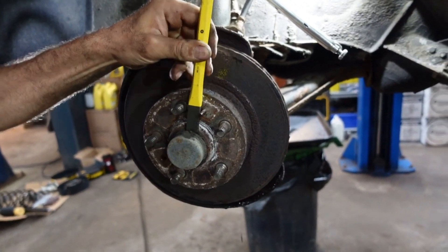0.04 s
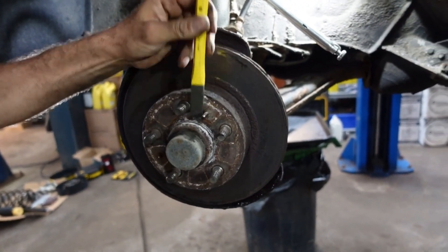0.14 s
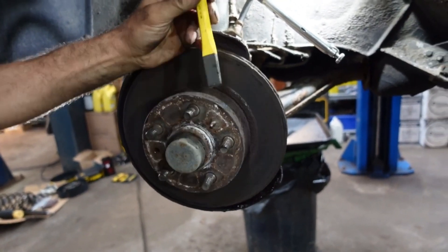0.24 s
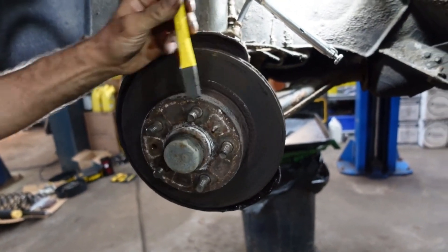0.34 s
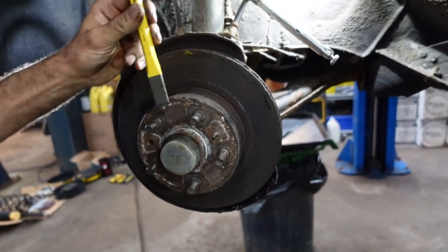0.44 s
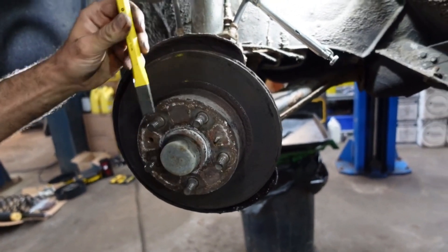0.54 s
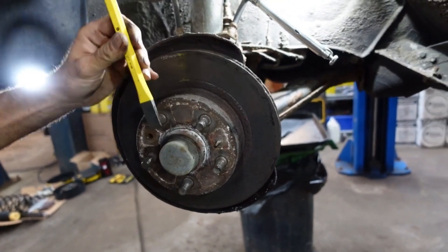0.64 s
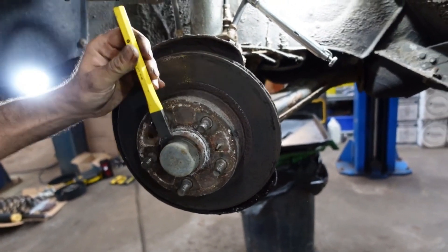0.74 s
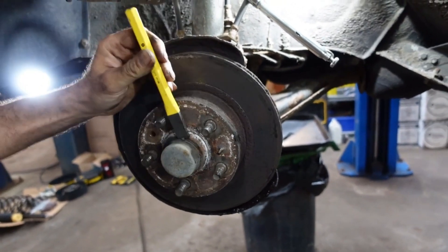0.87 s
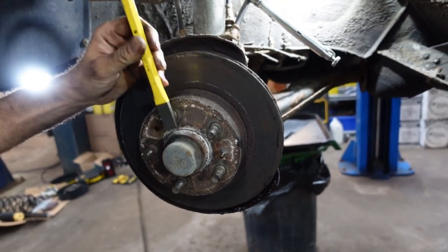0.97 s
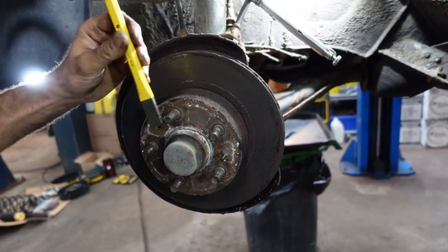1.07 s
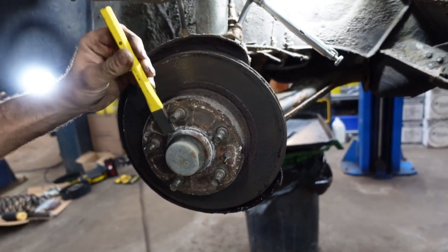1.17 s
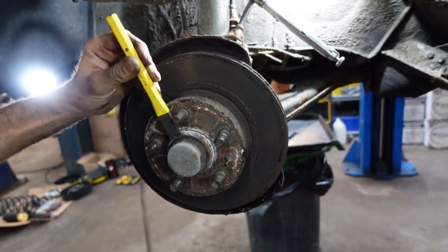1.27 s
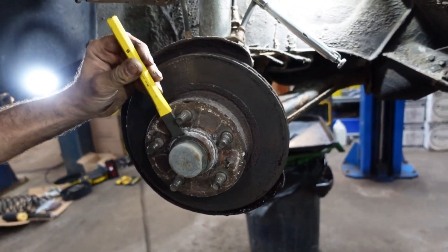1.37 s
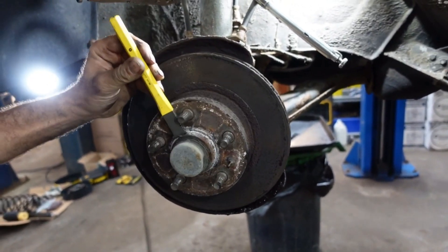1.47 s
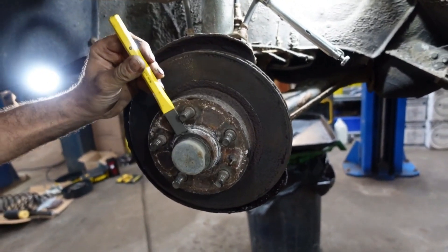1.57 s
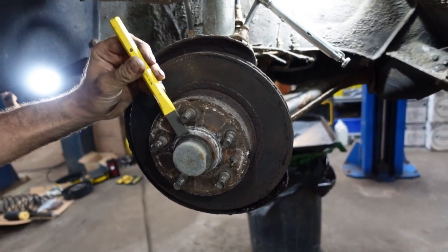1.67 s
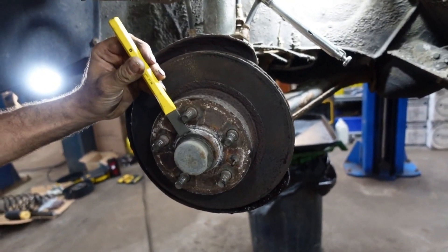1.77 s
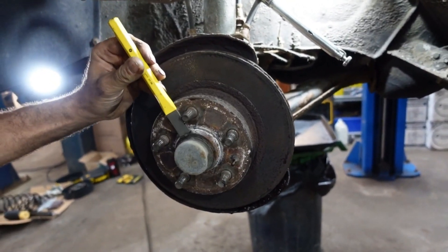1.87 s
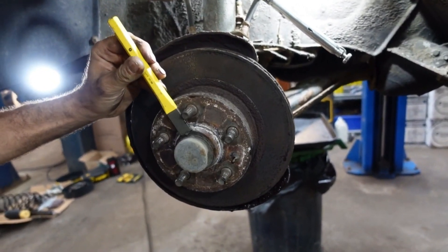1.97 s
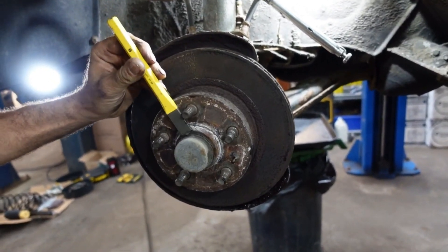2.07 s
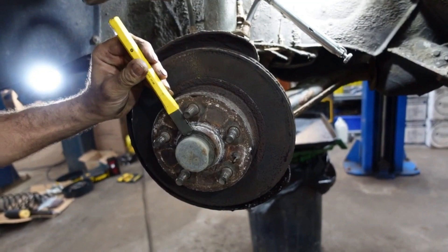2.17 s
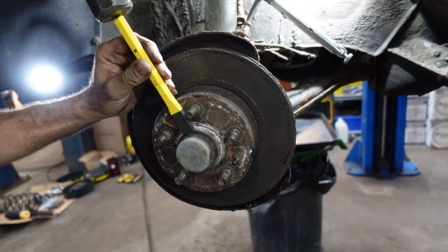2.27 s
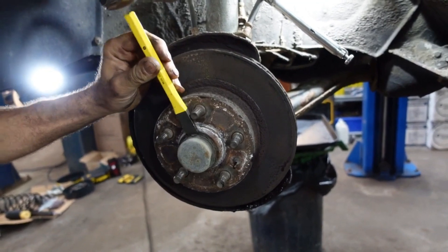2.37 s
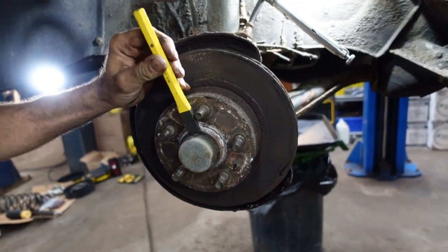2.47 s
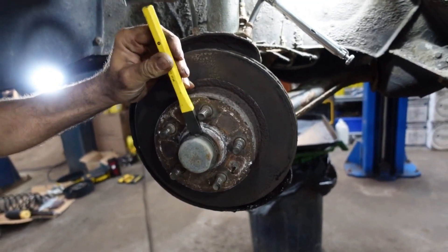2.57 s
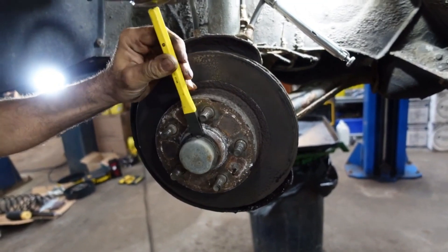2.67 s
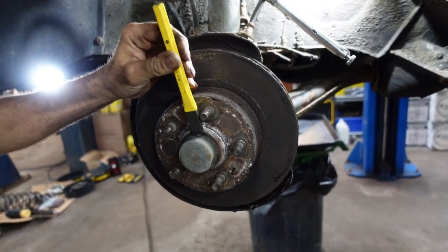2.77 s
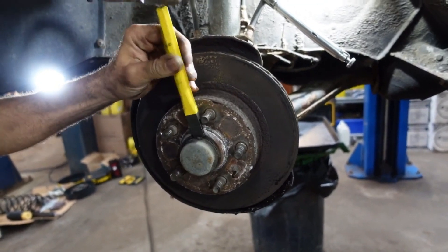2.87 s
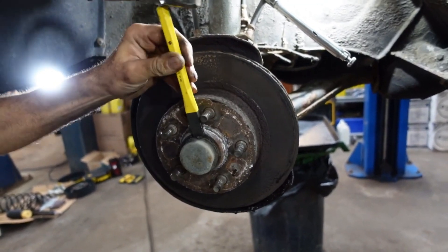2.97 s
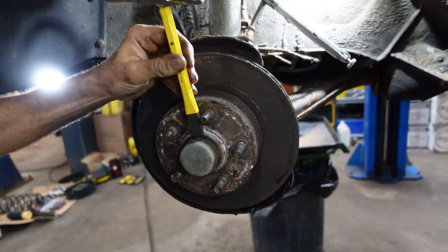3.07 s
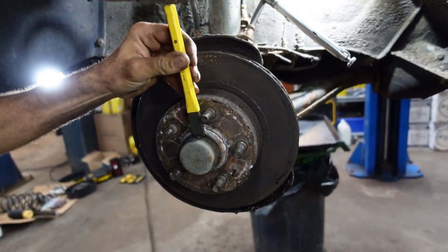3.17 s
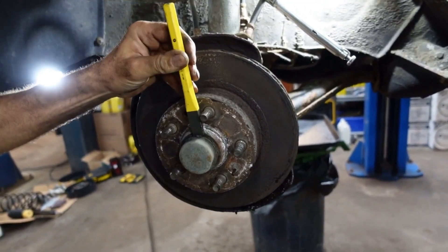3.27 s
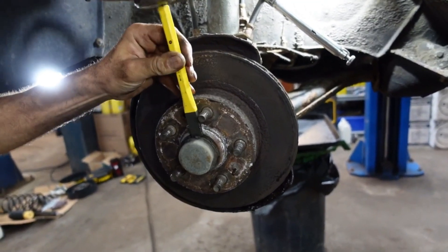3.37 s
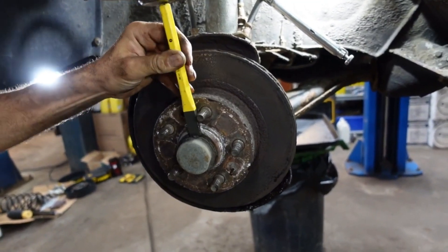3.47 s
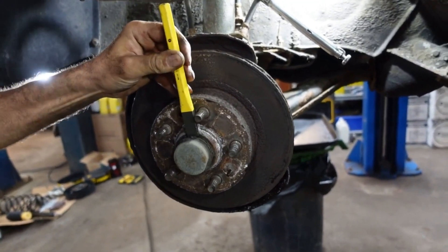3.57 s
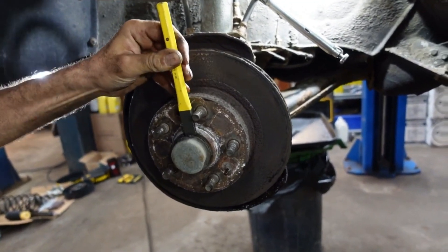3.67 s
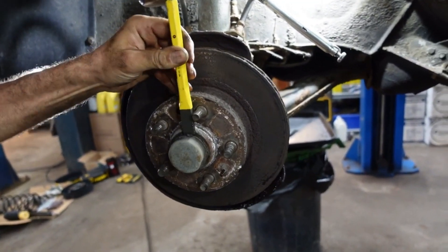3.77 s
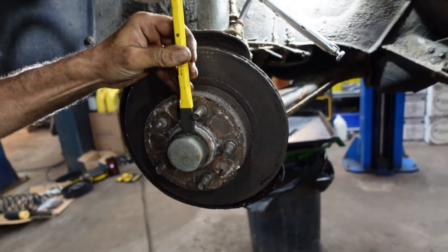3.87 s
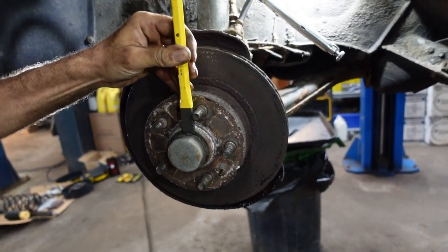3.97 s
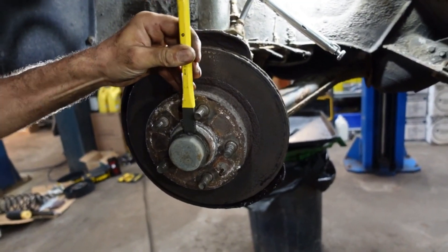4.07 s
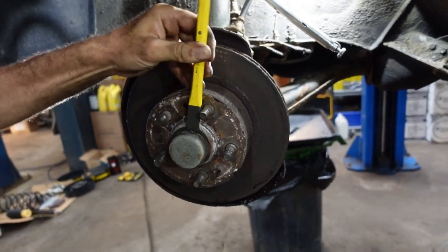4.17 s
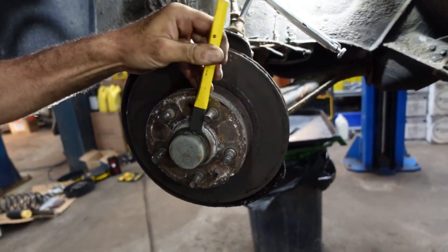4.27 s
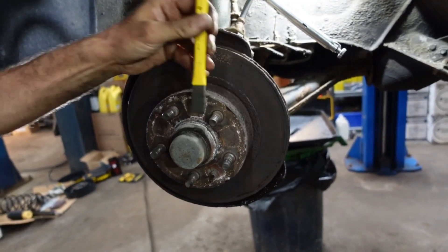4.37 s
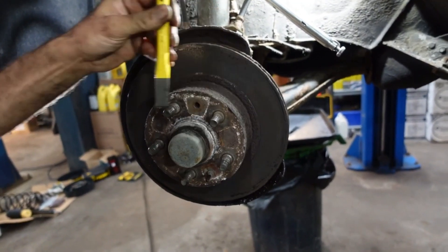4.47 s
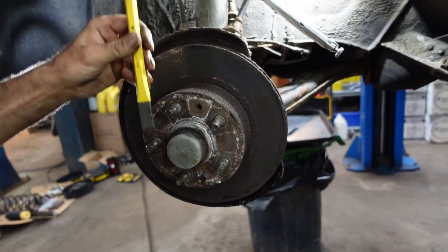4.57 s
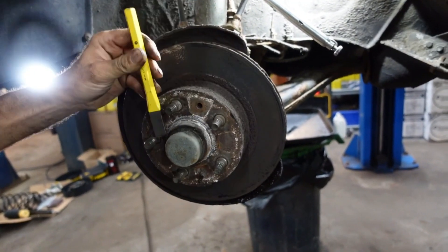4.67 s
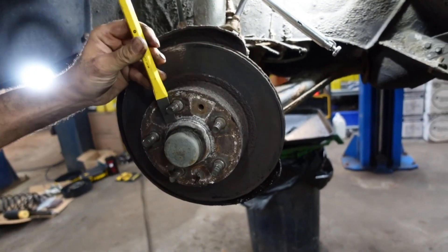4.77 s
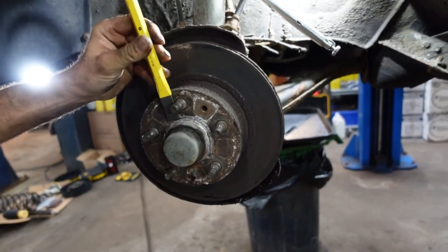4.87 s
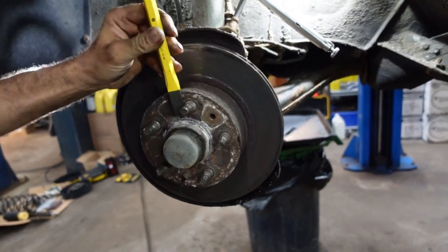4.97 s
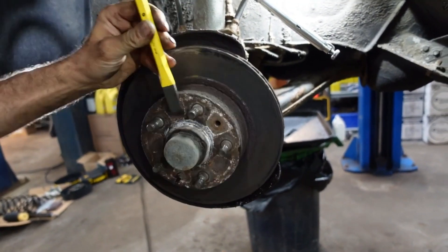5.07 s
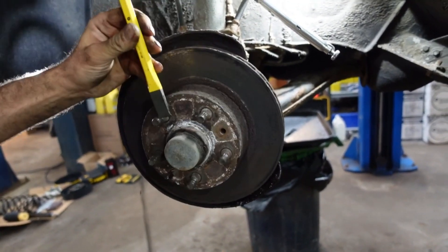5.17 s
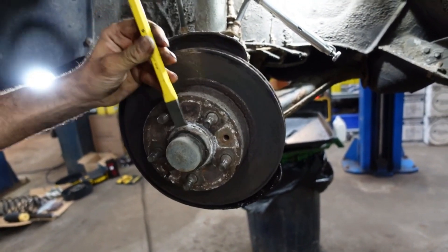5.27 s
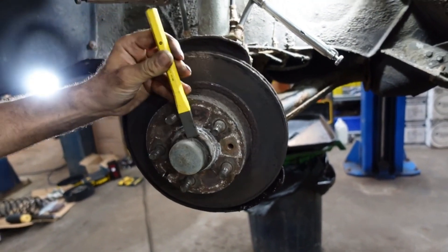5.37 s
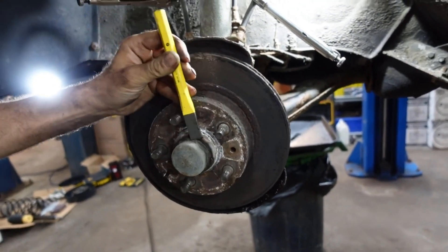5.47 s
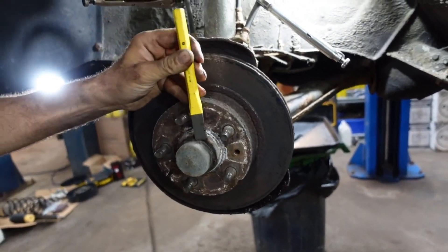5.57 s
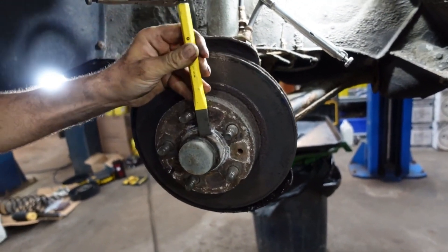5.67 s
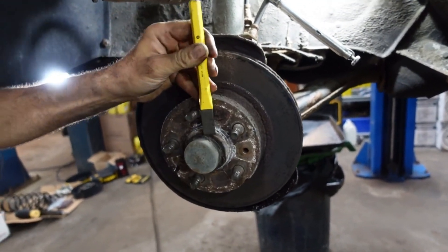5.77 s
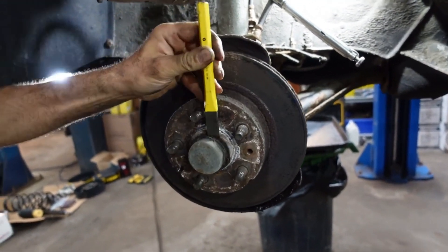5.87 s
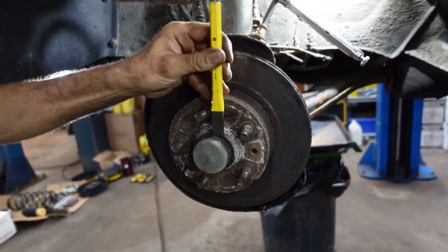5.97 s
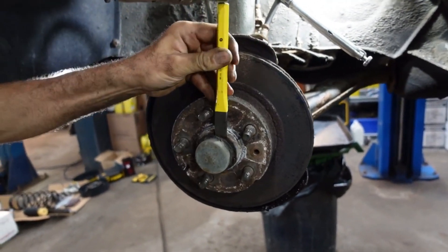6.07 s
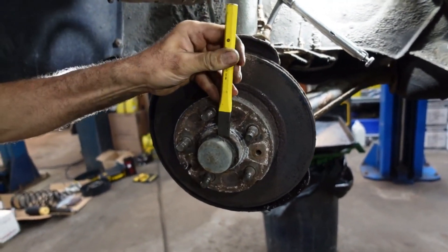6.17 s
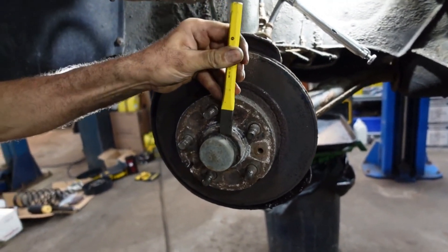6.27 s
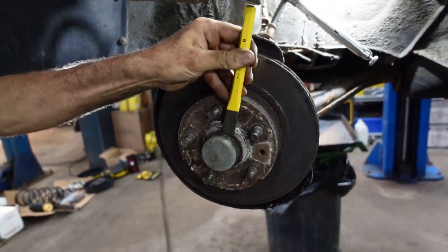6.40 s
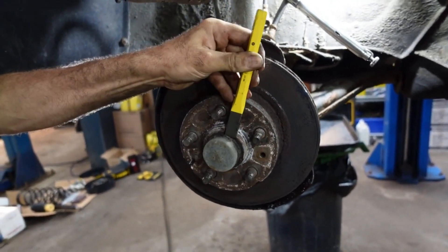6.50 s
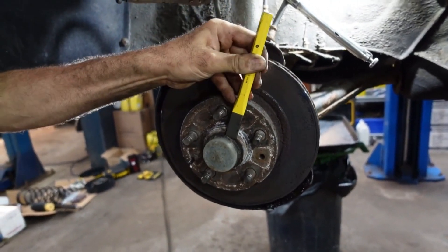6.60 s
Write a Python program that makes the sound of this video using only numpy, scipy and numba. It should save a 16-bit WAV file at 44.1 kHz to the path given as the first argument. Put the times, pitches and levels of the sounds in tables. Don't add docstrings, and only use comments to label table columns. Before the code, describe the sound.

Close to the work in a hard-walled workshop: steel chisel edge grates and clicks on rusty metal under a dying clang. A run of sharp hammer strikes comes at uneven gaps, each a bright crack with short metallic ringing, low thump and a long roomy tail. A pause with bright taps and brief squeals follows, then two final strikes, weak and strong, over low hum.

```python
import sys
import numpy as np
from scipy import signal
from scipy.fft import rfft, irfft, next_fast_len
from scipy.io import wavfile
from scipy.ndimage import uniform_filter1d, minimum_filter1d, map_coordinates
from numba import njit

SR = 44100
rng = np.random.default_rng(int(sys.argv[2]) if len(sys.argv) > 2 else 0)


def file_out(sig):
    cols = np.atleast_2d(sig).T
    lim = np.clip(cols, -1, 1)
    pcm = np.round(lim * 32767).astype(np.int16)
    wavfile.write(sys.argv[1], SR, pcm)


def amplitude_ratio(level_db):
    exponent = np.asarray(level_db, float) / 20
    return 10 ** exponent


N = 292824
LEAD, TAIL = SR // 4, 3 * SR // 2

# pitch_hz, density_db_per_hz
SHOP_SPECTRUM = [(15, -54), (25, -22), (87, -22.5), (108, 0.5), (159, 3.5), (202, -15.5), (245, -2),
                 (496, -15.5), (553, -15), (1150, -17), (3150, -30.5), (6380, -33), (9080, -38),
                 (15200, -43), (16500, -58)]
# pitch_hz, likeness_0_to_1
LIKENESS = [(60, 1), (300, .98), (1000, 0.9), (5000, 0.84), (12000, 0.88)]
# pitch_hz, t60_s
HALL_DECAY = [(100, 1.5), (400, 1.19), (1500, 1.87), (5000, 1.63), (10000, 0.79), (16000, 0.82)]
# pitch_hz, build_up_s
HALL_BUILD_UP = [(100, 0.01), (400, 0.012), (900, 0.0015), (2000, 0.0013), (8000, 0.048)]
# start_s, peak_db, low_part_db, length_s
TICKS = [(0.252, -23, -10, .03), (3.357, -25, -4, 0.022), (3.652, -26, -8, .04), (0.508, -23, -31, 0.1),
         (0.5174, -21, -1, 0.021), (0.657, -21, -25, 0.017), (0.699, -30.5, -8, 0.04),
         (0.996, -71, -7, 0.12), (1.279, -40.5, 11.5, 0.035), (1.5865, -36, -0.5, 0.071),
         (1.955, -48, 7, 0.024), (2.276, -32.5, -5.5, 0.1), (2.434, -33.5, 5.5, 0.051),
         (3.179, -32, 8, 0.043), (3.309, -38.5, 11.5, 0.049), (4.598, -13.5, -18, 0.043),
         (4.617, -42, 9.5, 0.086), (5.169, -45, 10.5, 0.06), (5.415, -30, -15, 0.058),
         (5.482, -32, -18, 0.034), (5.552, -39, -4, 0.042), (6.181, -18, -24, 0.065)]
# bite_s, build_up_s, level_db, squeal_over_level_db
SCRAPES = [(.188, 0.035, -32, 17), (.27, 0.068, -34, -3), (.31, 0.049, -30.5, 1), (.35, 0.013, -17, -20),
           (.385, .03, -53, -1), (.686, 0.022, -56, 24), (0.773, .012, -58, 34), (0.834, 0.035, -41, 16.5),
           (2.303, 0.0024, -31, 9), (2.291, 0.003, -39, 14), (4.382, .032, -31, 20.5),
           (4.404, 0.03, -29, 13), (4.426, 0.038, -28, 3), (4.815, 0.031, -28.5, 10),
           (5.389, 0.039, -52, 19), (5.44, 0.046, -55, 20.5)]
# pitch_hz, width_hz, level_db
EDGE = [(3907, 1030, 15.5), (5420, 980, 14), (5970, 540, 12.5), (7840, 2000, -12), (9130, 360, 4)]
# pitch_hz, width_hz, level_db
SQUEAL = [(1900, 200, 1), (2503, 118, 2), (2575, 88, 4.5)]
# start_s, strength_db, then over it part_group_2_db, bend_1_db, bend_2_db
CAP_TAPS = [
    (0.1564, -35.5, 4, -7, -3.5),
    (0.1884, -37, -1, -12, -2.5),
    (0.3925, -13, -36, -6, -16),
    (0.9334, -43, 18, 7, -9),
    (1.0799, -43.5, 12, -5, -42),
    (4.4228, -20, 1.5, -4, -5),
    (5.3834, -40, 4, 3, -5),
    (5.6989, -31.5, 4, 23.5, -3),
]
DISC_TAPS = [
    (0.7732, -53.5, -14, -21, 1),
    (0.827, -52.5, 14, -9, 4),
    (1.2364, -29.5, 3.5, -0.5, -1.5),
    (1.3548, -35.5, 1, -6, -12),
    (4.7129, -26, -27, 17.5, 1),
    (4.8205, -17, -7, 5, -5),
    (4.8375, -28, 3.5, 14, 8),
    (6.0671, -44.5, 16, -7, -4),
]
GRAZES = [(0.2714, -38.5, 24.5, 5, 1), (0.2843, -33, 6, 24.5, -1), (0.3212, -27.5, 14.5, -5, -11),
          (0.3474, -29, 14, -1.5, -6), (0.3574, -31, 9, 5, -15), (0.3734, -33, 0.3, 0.3, -12),
          (0.3884, -26, -24, -19, -21), (0.8144, -60, 16, -9, -7), (4.352, -22.5, -6, -6, -13),
          (4.3765, -20, -24, -14, 6), (4.4049, -22.5, -19, -11, 12), (4.7344, -18.5, -12, -12, -23),
          (4.7955, -27, -31, -3, 8), (4.8284, -7, -30, 10.5, 1)]
# pitch_hz, level_db, t60_s
CAP = [
    [(2267, 4.5, 0.077), (2255, -25, 0.85)],
    [(1940, -8.5, 0.058), (1843, -4.5, 0.027), (1435, -9, 0.034), (734, -10, 0.043)],
]
# pitch_hz, level_db, t60_s
DISC = [
    [(2335, 10, 0.058), (2340, -18, 1.32), (2350, -15, 0.92), (2210, -24, 0.78), (2340, 8, 0.19),
     (1971, 18.5, 0.017), (1740, 8.5, 0.034), (959, -9, 0.15), (704, -3, 0.06), (449, -19.5, 0.33)],
    [(2656, 3, 0.17), (2550, -22.5, 1)],
]
# pitch_hz, level_db, t60_s
CHISEL = [
    [(5310, -1.5, 0.035), (4617, -13, 0.009), (5516, -5.5, 0.026), (5470, -46, 0.66)],
    [(6280, 7.5, 0.053), (6580, -3, 0.077), (7400, -2, 0.025)],
    [(9570, 2.2, 0.061), (12110, 1.3, 0.041), (14960, 3.9, 0.034)],
]
# pitch_hz, density_db_per_hz
CRACK = [(100, -18), (300, -12), (1000, 2), (2000, -7), (4000, 5.5), (7000, 4), (10000, -10), (14000, -4.5),
         (17000, -68)]
# start_s, strength_db, thump_db, hammer_ring_db, frame_hum_db
BLOWS = [
    (-.06, 3.5, -6, -1.5, -18),
    (2.3239, -8.5, 4, -28, -25.5),
    (2.6554, 6.5, -5, 6, -24.5),
    (2.9311, 8.5, -2, -7, -27),
    (3.446, 5, 0, 12, -22),
    (3.7726, 10, -2.5, 8.5, -24),
    (4.1152, 8, -2, 8.5, -21.5),
    (6.0686, -7, 1, -36, -22.5),
    (6.4148, 9.5, -2.5, -11, -25),
]
# pitch_hz, level_db, t60_s
CONTACT = [(5500, -7, 0.034), (1861, 0.5, 0.035), (3646, -11.5, 0.038), (982, -14, 0.15),
           (9560, -14, 0.029), (11380, -37.5, 0.18)]
# pitch_hz, level_db, t60_s
HUB_RING = [(444, -1, 0.4), (510, -2.5, 0.3), (571, 4, 0.3), (678, -1, 0.45), (799, -3, .3), (926, 5, 0.3),
            (1050, -3, 0.32), (1183, 1, 0.3), (1830, -10, 0.6), (1950, 4, 0.14), (3690, -8, 0.3),
            (1856, -7, .5), (5570, -19, 0.6), (5520, -18, .8)]
# pitch_hz, width_hz, level_db
HUB = [(5530, 76, 16), (1841, 45, 14.5), (1750, 21, 2), (929, 17, 10.5), (1185, 36, 7), (525, 8.6, 9.5),
       (300.6, 81, 17), (720, 21, 9.5), (3620, 300, 7), (7900, 890, 12.5), (9600, 80, 13.5), (11300, 77, 4)]
# pitch_hz, density_db_per_hz
BLOW_COLOUR = [(24, -74), (40, -19.5), (148, -1.5), (396, -16), (510, -9.5), (933, -13), (1360, -24),
               (1890, -18), (2900, -21.5), (5580, -26), (6660, -32.5), (14900, -44.5), (16500, -78)]
# delay_s, level_db
WALLS = [(.012, -16), (0.026, 4), (.040, -3.5), (.048, -2), (.063, -35), (0.071, 0), (0.084, -17),
         (.12, -7)]
# pitch_hz, level_db, t60_s
FRAME = [(150.3, 0, 3.92), (152.7, 0.5, 0.68), (128.6, -12.5, 5), (201.4, 9, 0.34)]

SHOP_DB, DRIFT_DB = -41, .8
SCATTER_DB = 2
GRIT_DB = 3
BUILD_DB, LET_GO_DB_PER_S = 16.5, 557
TICK_TOP_HZ, TAP_TOP_HZ = 9000, 7000
TOP_GROWS_DB_PER_DB = 0.47
TOUCH_S, GRAZE_S = .001, .004
SNAP_S = .012
HALL_DB, HALL_LAGS_DB_PER_DB = 20, 0.24
OFF_CENTRE_DB_PER_DB, BEND_FROM_HZ = 0.52, 3000


def along(points, hz):
    f, v = np.transpose(points)
    return np.interp(np.log(hz + 1), np.log(f + 1), v)


def unit(x):
    return x / np.sqrt(np.mean(x ** 2) + 1e-20)


def filtered(x, response):
    n = x.shape[-1]
    m = next_fast_len(n + 8192)
    return irfft(rfft(x, m) * response(np.fft.rfftfreq(m, 1 / SR)), m)[..., :n]


def lowpass(f, corner_hz, order=1):
    return 1 / (1 + 1j * f / corner_hz) ** order


def resonances(peaks, f):
    total = 0
    for k, (hz, width_hz, db) in enumerate(peaks):
        total = total + (-1) ** k * amplitude_ratio(db) * 1j * f * width_hz / (hz * hz - f * f + 1j * f * width_hz)
    return total


def ringing(modes, t):
    out = np.zeros(len(t))
    for hz, db, t60_s in modes:
        u = t[t < 1.5 * t60_s]
        level_db = db + SCATTER_DB * rng.standard_normal() - 60 * u / t60_s
        out[:len(u)] += amplitude_ratio(level_db) * np.sin(2 * np.pi * hz * u)
    return out


def add(out, start_s, x):
    part = out[..., round(start_s * SR) + LEAD:][..., :x.shape[-1]]
    part += x[..., :part.shape[-1]]


def diffuse(size):
    def mid_side(hz):
        turn = np.arccos(np.clip(along(LIKENESS, hz), -1, 1)) / 2
        return np.array([np.cos(turn), np.sin(turn)])

    mid, side = filtered(rng.standard_normal((2, size)), mid_side)
    return np.array([mid + side, mid - side])


def splinters(noise, size):
    burst = unit(filtered(noise, lambda f: amplitude_ratio(along(CRACK, f))))
    return np.pad(burst, [(0, 0)] * (burst.ndim - 1) + [(0, size - burst.shape[-1])])


def shop():
    drift = map_coordinates(rng.standard_normal(40), [np.arange(N + LEAD) * 4 / SR])
    hum = unit(filtered(diffuse(N + LEAD), lambda f: amplitude_ratio(along(SHOP_SPECTRUM, f))))
    return amplitude_ratio(SHOP_DB + DRIFT_DB * drift) * hum


def hall_tail():
    hz, t, z = signal.stft(diffuse(TAIL), SR, nperseg=256)
    early = amplitude_ratio(-60 * t / 0.38)
    late = amplitude_ratio(-9 - 60 * t / along(HALL_DECAY, hz)[:, None])
    fill = 1 - np.exp(-(t / along(HALL_BUILD_UP, hz)[:, None]) ** 2)
    tail = signal.istft(z * fill * (early + late), SR, nperseg=256)[1][:, :TAIL]
    return tail / np.linalg.norm(tail[0])


def ticks():
    out, t = np.zeros(N + LEAD), np.arange(SR // 10) / SR
    for start_s, db, low_db, length_s in TICKS:
        def tone(f):
            low = amplitude_ratio(low_db + 15.5) * 1j * f / (500 + 1j * f)
            return (1j * f / 3000 + low) * lowpass(f, 3000) * lowpass(f, TICK_TOP_HZ, order=2)

        fade = amplitude_ratio(-60 * t / np.clip(length_s, .005, 1))
        puff = fade * rng.standard_normal(len(t)) * (1 - np.exp(-t / 0.0013))
        add(out, start_s - .001, amplitude_ratio(db - 4) * filtered(puff, tone))
    return out


def scrape():
    time = np.arange(N + LEAD) / SR - LEAD / SR
    level = np.zeros((2, N + LEAD))
    for bite_s, build_s, db, squeal_db in SCRAPES:
        rise_db = BUILD_DB * (time - bite_s) / build_s
        swell_db = np.where(time < bite_s, rise_db, LET_GO_DB_PER_S * (bite_s - time))
        level += (time > bite_s - build_s) * amplitude_ratio(db - 11.0 + swell_db) * amplitude_ratio([[0], [squeal_db]])
    clicks = rng.standard_normal((2, len(time))) * amplitude_ratio(GRIT_DB * rng.exponential(size=len(time)))

    def tone(f):
        return np.array([1.7 * resonances(EDGE, f), 6 * resonances(SQUEAL, f)])

    return filtered(level * unit(clicks), tone).sum(axis=0)


def taps(table, groups, free, rise_s, top_db):
    out, t = np.zeros(N + LEAD), np.arange(SR) / SR
    for start_s, db, *over_db in table:
        highest_db = top_db + TOP_GROWS_DB_PER_DB * (db + over_db[-1])
        levels_db = [db] + [db + more for more in over_db] + [highest_db]
        ring = np.zeros(len(t))
        for level_db, modes in zip(levels_db, groups):
            damped = [(hz, mode_db, t60_s * free) for hz, mode_db, t60_s in modes]
            ring += amplitude_ratio(level_db + 4.0) * ringing(damped, t)
        burst = splinters(rng.standard_normal(SR // 10), SR)
        crack = filtered(burst, lambda f: lowpass(f, TAP_TOP_HZ, order=2))
        crack = amplitude_ratio(max(levels_db) - 5 - 60 * t / 0.035) * crack
        add(out, start_s - .001, (ring + crack) * (1 - np.exp(-t / rise_s)))
    return out


def off_centre_db(hz, ring_db):
    return -OFF_CENTRE_DB_PER_DB * np.clip(ring_db, -9, 9) * (hz > BEND_FROM_HZ)


def contact_ring(ring_db, t):
    head_hz, head_db, head_t60_s = CONTACT[0]
    modes = [(head_hz, head_db + ring_db, head_t60_s)]
    modes += [(hz, db + off_centre_db(hz, ring_db), t60_s) for hz, db, t60_s in CONTACT[1:]]
    ring = ringing(modes, t)
    return ring + amplitude_ratio(-21.5) * (1 - np.exp(-t / 0.0047)) * ringing(HUB_RING, t)


def blow_crack(t):
    burst = splinters(diffuse(SR // 10), TAIL)
    snap = 1.5 * amplitude_ratio(-60 * t / SNAP_S) * burst
    return snap + 0.7 * amplitude_ratio(-60 * t / 0.068) * filtered(burst, lambda f: lowpass(f, 5000, order=2))


def blow_hall(db, thump_db, ring_db):
    head_hz, head_width_hz, head_db = HUB[0]
    hub = [(head_hz, head_width_hz, head_db + ring_db)]
    for hz, width_hz, lift_db in HUB[1:]:
        lift_db = lift_db + off_centre_db(hz, ring_db) + SCATTER_DB * rng.standard_normal()
        hub.append((hz, width_hz, lift_db))

    def colour(f):
        weight = amplitude_ratio(thump_db / (1 + (f / 800) ** 2))
        bright = amplitude_ratio(0.17 * db / (1 + (7000 / (f + 1)) ** 2))
        peaks = 1 + sum(np.abs(resonances([peak], f)) for peak in hub)
        return weight * bright * amplitude_ratio(along(BLOW_COLOUR, f)) * peaks

    hall = filtered(hall_tail(), colour)
    return hall * amplitude_ratio(HALL_DB - HALL_LAGS_DB_PER_DB * db) / np.linalg.norm(hall[0])


def wall_thumps(thump_db, t):
    push = t[:SR // 20] * 2 * np.pi * 310
    thump = np.sin(push) * push * np.exp(-push / 4.6)
    out = np.zeros(len(t))
    for delay_s, wall_db in WALLS:
        level_db = wall_db + thump_db - 19.0 + SCATTER_DB * rng.standard_normal()
        out[round(delay_s * SR):][:len(thump)] += amplitude_ratio(level_db) * thump
    return out


def frame_hum(frame_db, t):
    fade = np.cos(np.pi / 2 * t / t[-1])
    return amplitude_ratio(frame_db) * fade * (1 - np.exp(-t / 0.0074)) * ringing(FRAME, t)


def hammer():
    out, t = np.zeros((2, N + LEAD)), np.arange(TAIL) / SR
    for start_s, db, thump_db, ring_db, frame_db in BLOWS:
        direct = (contact_ring(ring_db, t) + blow_crack(t)) * amplitude_ratio([[-.4], [.4]])
        hall = blow_hall(db, thump_db, ring_db) * amplitude_ratio([[-.35], [.35]])
        low = wall_thumps(thump_db, t) + frame_hum(frame_db, t)
        add(out, start_s, amplitude_ratio(db) * (direct + hall + low))
    return out


@njit
def held_peak(size, release):
    held, level = np.empty(len(size)), 0.0
    for i in range(len(size)):
        level = max(size[i], level * release)
        held[i] = level
    return held


def limiter(air, top_db, release_db_per_s):
    held = held_peak(np.abs(air).max(axis=0), amplitude_ratio(-release_db_per_s / SR))
    need = np.minimum(1, amplitude_ratio(top_db) / (held + 1e-9))
    return air * uniform_filter1d(minimum_filter1d(need, size=41), size=21)


def scene():
    chisel = scrape() + ticks()
    chisel += taps(CAP_TAPS, CAP + CHISEL, free=1, rise_s=TOUCH_S, top_db=-22)
    chisel += taps(DISC_TAPS, DISC + CHISEL, free=1, rise_s=TOUCH_S, top_db=-26.5)
    chisel += taps(GRAZES, DISC + CHISEL, free=0.18, rise_s=GRAZE_S, top_db=-25)
    dull = filtered(chisel, lambda f: lowpass(f, 8000))
    echo = signal.fftconvolve(dull[None], hall_tail(), axes=1)[:, :N + LEAD]
    air = shop() + amplitude_ratio(-16) * echo + chisel * amplitude_ratio([[-.4], [.4]]) + hammer()
    air = limiter(air, top_db=8, release_db_per_s=256)
    return limiter(air, top_db=1, release_db_per_s=40)[:, LEAD:]


def roll_off(x):
    return signal.sosfilt(signal.butter(12, 16830, fs=SR, output="sos"), x)


def record(dry):
    def microphone(f):
        return (1j * f / (30 + 1j * f)) ** 2 / np.sqrt(1 + (f / 15800) ** 40)

    x = filtered(dry, microphone)
    x = x / (1 + np.abs(x / .76) ** 6) ** (1 / 6)
    return roll_off(x)


dry = scene()
out = record(dry)
file_out(out)
```